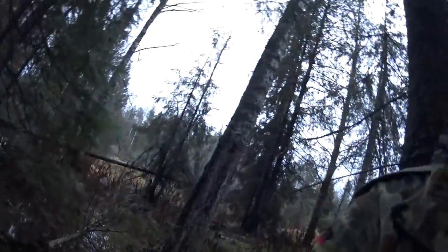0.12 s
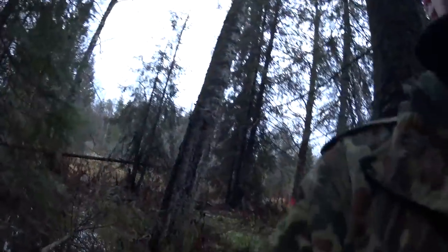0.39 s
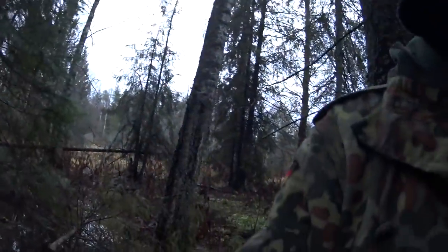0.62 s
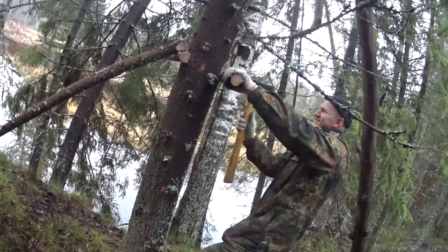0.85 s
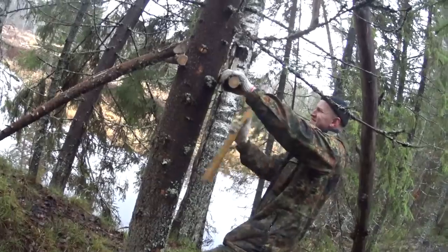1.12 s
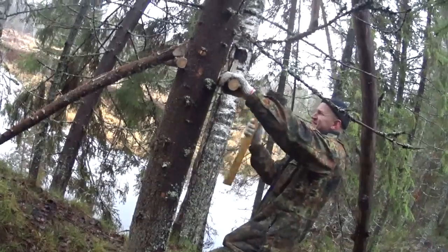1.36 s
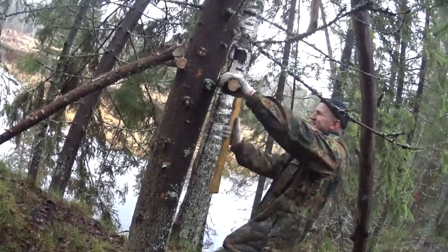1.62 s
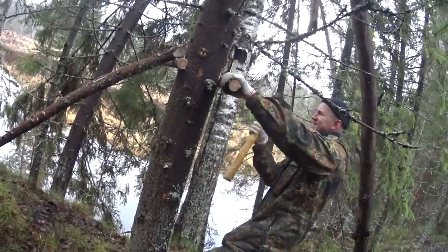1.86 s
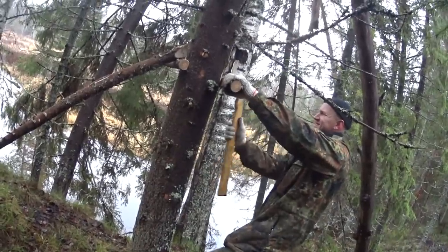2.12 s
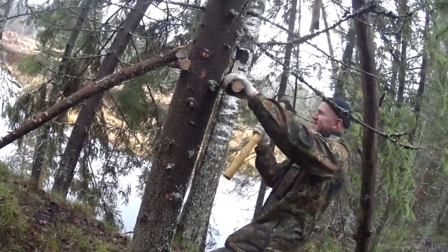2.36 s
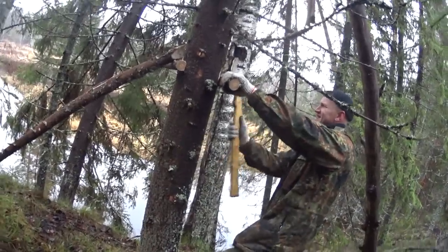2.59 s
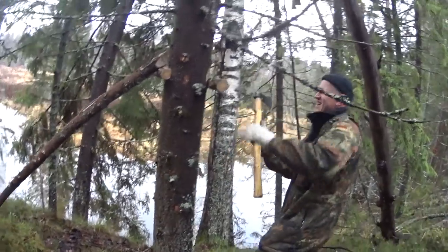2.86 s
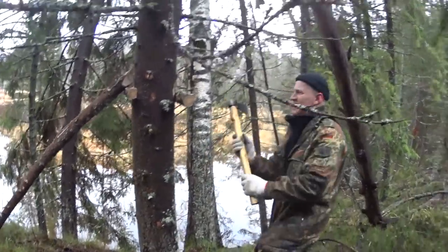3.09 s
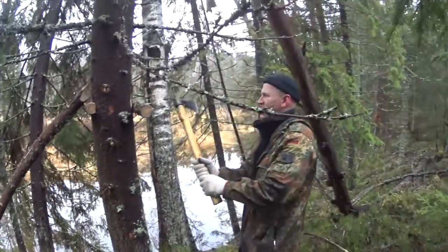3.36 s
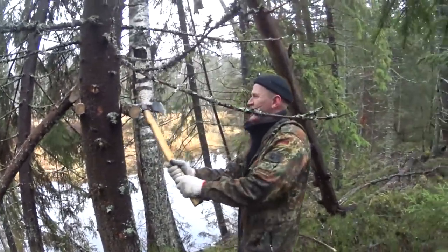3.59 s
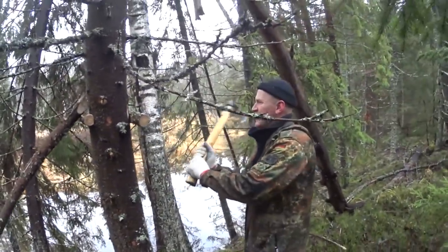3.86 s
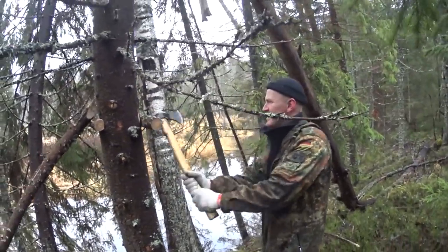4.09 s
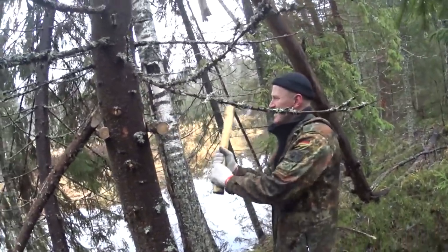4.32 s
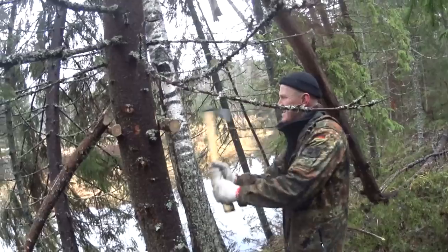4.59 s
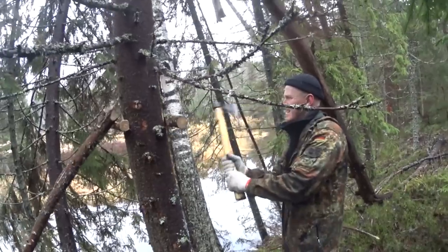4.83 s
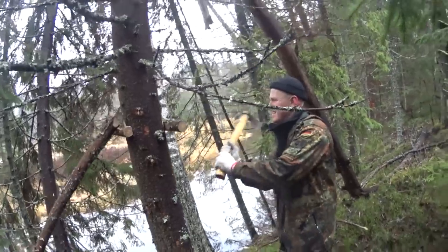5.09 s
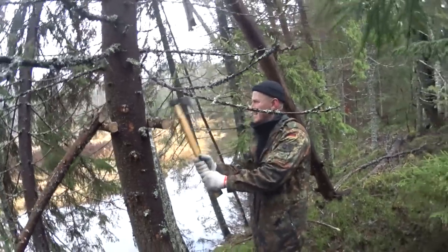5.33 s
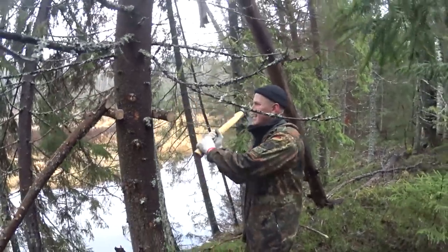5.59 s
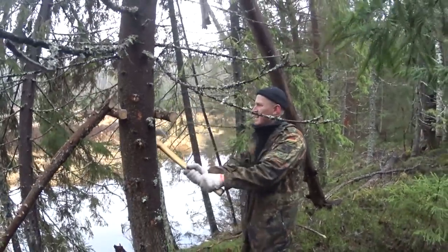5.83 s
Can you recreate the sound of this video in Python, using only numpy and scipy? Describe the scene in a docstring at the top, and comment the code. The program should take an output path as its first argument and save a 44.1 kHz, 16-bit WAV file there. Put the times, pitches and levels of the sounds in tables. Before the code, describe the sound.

Quiet, soft forest air with faint jacket hiss opens the scene; at about 0.6 s a small twig tick and a much sharper snap sound to the left. At 0.82 s the sound drops out for a few hundredths of a second, then returns wider with the fading tail of a blow. The back of a hatchet drives a nail into a trunk: sharp, dry woody cracks at about 1.2, 1.65, 2.1 and 2.55 s, the last with a clearer steel ring. From 1.0 to 1.25 s a hand scrapes roughly over the camera body, with clicks and a sleeve swish. After a gap of nearly a second, filled by light rustle and ticks, slower blows fall at 3.5, 4.1, 4.65, 5.2 and 5.8 s, the first more hollow. Each scatters briefly off the trees. A twig snaps near 4.96 s, among jacket rustling and faint rubs.

```python
"""In a forest, the back of a hatchet drives a nail into a trunk in steady blows, heard through a camera's two ports.
Each blow rings modes of wood and steel under a noisy crack; noise that dies away stands for the scatter off the trees.
On the camera body a hand rubs as friction noise; twigs tick as short noise bursts and a jacket rustles as
uneven hiss, over the coloured noise of the hush of the wood.
An edit leaves a short silence before the hammering; the camera widens the difference of its two ports."""
import sys
import numpy as np
from scipy import signal
from scipy.fft import rfft, irfft, next_fast_len
from scipy.io import wavfile
from scipy.ndimage import uniform_filter1d, map_coordinates

SR = 44100
rng = np.random.default_rng(int(sys.argv[2]) if len(sys.argv) > 2 else 0)


def digitize_waveform(pressure):
    """Quantize a signal to 16-bit integers and store it at the path in sys.argv[1].

    Rows of a 2-D input are taken as channels; values are limited to [-1, 1].
    """
    field = np.atleast_2d(pressure).T
    bounded = np.clip(field, -1, 1)
    quanta = np.round(bounded * 32767).astype(np.int16)
    wavfile.write(sys.argv[1], SR, quanta)


def boost_factor(decibels):
    """Convert a level in decibels to a linear amplitude factor."""
    exponent = np.asarray(decibels, float) / 20
    return 10 ** exponent


N = 262395  # length in samples


def unit(x):
    """Scale to rms 1."""
    return x / np.sqrt(np.mean(x ** 2) + 1e-20)


def along(points, hz):
    """Read (Hz, value) points on a log frequency axis."""
    f, v = np.transpose(points)
    return np.interp(np.log(hz + 1), np.log(f + 1), v)


def filtered(x, response):
    """Multiply the spectrum of x by a complex response of frequency."""
    m = next_fast_len(x.shape[-1] + 8192)
    spectrum = rfft(x, m) * response(np.fft.rfftfreq(m, 1 / SR))
    return irfft(spectrum, m)[..., :x.shape[-1]]


def coloured(x, spectrum):
    """Shape x by (Hz, dB) points."""
    return filtered(x, lambda hz: boost_factor(along(spectrum, hz)))


def noise(spectrum, size):
    """Coloured noise of rms 1."""
    return unit(coloured(rng.standard_normal(size), spectrum))


def wobble(rate):
    """A smooth random curve, rate knots a second."""
    knots = rng.standard_normal(int(N * rate / SR) + 4)
    return map_coordinates(knots, [np.arange(N) * rate / SR])


def level_curve(points, t):
    """Amplitude along (s, dB) points, all but silent outside them."""
    return boost_factor(np.interp(t, *np.transpose(points), left=-120, right=-120))


def add(track, s, sound):
    """Mix a sound into a track from time s."""
    part = track[..., min(round(s * SR), N):][..., :sound.shape[-1]]
    part += sound[..., :part.shape[-1]]


def ringing(modes, t):
    """Dying modes of alternate sign, at slightly new strengths for each blow."""
    total = 0
    for k, (hz, db, t60) in enumerate(modes):
        strength = boost_factor(db + 1.2 * rng.standard_normal() - 60 * t / t60)
        total = total + (-1) ** k * strength * np.sin(2 * np.pi * hz * t)
    return total


# Blows on the nail; the first falls before the hammering fades in, so only its tail is heard.
# Each row: start in seconds, then the levels of knock, hollow, steel and crack in dB.
BLOWS = [(0.72, -13.5, -19, -50, -18), (1.1895, -15, -33, -42, -24), (1.6466, -16, -32, -40.5, -22),
         (1.6894, -26.5, -37.5, -68, -40), (2.1126, -21, -18.5, -38, -20.5),
         (2.5591, -20, -52, -22.5, -17.5), (3.532, -17, -15, -49.5, -32.5),
         (4.118, -19.5, -27.5, -36, -17.5), (4.661, -21.5, -30.5, -43.5, -17.5),
         (5.225, -21.5, -37, -38.5, -16.5), (5.805, -19, -41, -53, -18)]
# Modes of the trunk, the handle, the wood grain, the hollow trunk, the steel head and the clink.
# Each row: frequency in Hz, level in dB within its layer, time to fall 60 dB in seconds.
TRUNK_MODES = [(875, -16.5, 0.014), (1134, -9, 0.025), (1213, -2, 0.023)]
HANDLE_MODES = [(1354, -4, 0.036), (1422, -9, 0.098)]
GRAIN_MODES = [(1930, -4, 0.014), (2090, -11, 0.022), (2300, -2, 0.017), (2658, -6.5, 0.02106),
               (3373, 1.5, 0.014)]
HOLLOW_MODES = [(452.4, -12.5, 0.043), (602.7, -15.5, 0.12)]
STEEL_MODES = [(4908, 0, .17), (4890, -9, .15), (4680, -16, .1)]
CLINK_MODES = [(5430, -6.5, 0.037), (6954, -7, 0.035), (9120, -2, 0.028)]
# Colours of the crack close by, of its return from the trees and of the thud down the trunk.
# Each row: frequency in Hz, relative level in dB.
CRACK_COLOUR = [(300, -7.5), (1500, -26.5), (3000, -6), (6000, -1.5), (9000, -13.5), (11000, -8)]
ECHO_COLOUR = [(300, -27.5), (1500, -5.5), (3000, -0.5), (6000, 0), (9000, -2), (11000, -3.5)]
THUD_COLOUR = [(40, -26), (150, -9), (400, -6.5), (900, -6), (3000, -51)]
# One distinct echo of the wood, a single pair: delay in seconds, level in dB.
FAR_BANK = (.184, -27)


def hatchet():
    """Each blow knocks the wood, rings the steel head, cracks, thuds down the trunk and fills the trees."""
    out, t = np.zeros(N), np.arange(SR // 4) / SR
    # driven hard while the head presses
    press = 1 + 0.95 * np.clip((.0042 - t) / 0.00083, 0, 1)
    contact = (1 - np.exp(-t / 0.00062)) ** 2 * press
    late = (1 - np.exp(-t / 0.0053)) ** 2  # the low trunk sound swells after the contact
    bass_cut = signal.butter(2, 500, "high", fs=SR)  # the small contact radiates little bass
    for s, knock_db, hollow_db, steel_db, crack_db in BLOWS:
        # the handle gains with hollow over knock
        handle_db = knock_db - 6 + 0.18 * (hollow_db - knock_db)
        # the grain grows by 2 dB a second as the nail sinks; a dull blow wakes it less
        grain_db = knock_db - 11.5 + 2 * s + 0.21 * (crack_db - knock_db)
        # a cleaner hit on the nail raises steel and clink together
        clink_over_crack_db = -10 + .3 * (steel_db + 38.5)

        trunk = boost_factor(knock_db) * ringing(TRUNK_MODES, t)
        handle = boost_factor(handle_db) * ringing(HANDLE_MODES, t)
        grain = boost_factor(grain_db) * ringing(GRAIN_MODES, t)
        hollow = boost_factor(hollow_db) * late * ringing(HOLLOW_MODES, t)
        steel = boost_factor(steel_db) * ringing(STEEL_MODES, t)
        crackle = boost_factor(-60 * t / 0.015) * noise(CRACK_COLOUR, len(t))
        clink = boost_factor(clink_over_crack_db) * ringing(CLINK_MODES, t)
        crack = boost_factor(crack_db) * (crackle + clink)
        thud = boost_factor(knock_db - 25 - 60 * t / 0.25) * late * noise(THUD_COLOUR, len(t))

        wood = trunk + handle
        sharp = signal.lfilter(*bass_cut, contact * (wood + grain + crack))
        add(out, s, sharp + steel + hollow + thud)
        into_trees = contact * (handle + boost_factor(-2) * trunk + boost_factor(-3.5) * grain) + hollow
        add(out, s, boost_factor(-2.5) * signal.fftconvolve(into_trees, trees(far_db=-16)))
        delay, echo_db = FAR_BANK
        add(out, s + delay, boost_factor(echo_db) * contact * wood)
        # the crack returns as smooth hiss
        add(out, s, boost_factor(crack_db + 22) * coloured(trees(far_db=-16.5), ECHO_COLOUR))
    return out


# Decay of the scatter off the near and the far trees.
# Each row: frequency in Hz, time to fall 60 dB in seconds.
NEAR_TREES = [(200, 0.052), (1200, 0.11), (5000, 0.21), (11000, 0.16)]
FAR_TREES = [(200, 0.58), (1200, 1), (5000, 0.85), (11000, 0.37)]


def trees(far_db):
    """A fresh scatter off the trunks: near ones die fast, far ones linger, single trunks make it lumpy."""
    hz, t, z = signal.stft(rng.standard_normal(SR), SR, nperseg=256)
    near = boost_factor(-60 * t / along(NEAR_TREES, hz)[:, None])
    far = boost_factor(far_db - 60 * t / along(FAR_TREES, hz)[:, None])
    trunks = uniform_filter1d(rng.standard_normal(z.shape), size=20, axis=0)
    trunks = uniform_filter1d(trunks, size=2, axis=1)
    lumps = boost_factor(2.2 * unit(trunks))
    tail = signal.istft(z * (near + far) * lumps, SR, nperseg=256)[1]
    return np.pad(tail, (150, 0)) / np.linalg.norm(tail)  # starts 150 samples late, energy 1


# The hand slides round the camera body in one long drag.
# Each row: time in seconds, pressure as a level in dB.
DRAG = [(.955, -62), (1.0, -49), (1.055, -44), (1.068, -37.5), (1.08, -52), (1.104, -52.5), (1.112, -37),
        (1.155, -32.5), (1.17, -41.5), (1.184, -22.5), (1.241, -20), (1.247, -58), (1.3, -40),
        (1.345, -39.5), (1.385, -64), (1.445, -70)]
# Short shifts of the fingers on the body.
# Each row: start in seconds, length in seconds, peak level in dB, place of the peak from 0 to 1.
RUBS = [(.869, 0.021, -53.5, 0.1), (0.927, 0.026, -46, .2), (1.485, 0.14, -49.5, 0.38),
        (1.688, .095, -40.5, 0.28), (1.798, 0.056, -51, 0.5), (1.995, 0.036, -50.5, 0),
        (2.352, 0.13, -45, 0.65), (2.515, 0.17, -45, 0.48), (2.695, 0.13, -55, 0.62),
        (2.964, 0.0296, -56, 0.1), (3.041, 0.019, -60.5, .5), (3.22, 0.11, -52, 0.48),
        (3.398, 0.0106, -49, .05), (4.006, 0.093, -55, 0.28), (4.662, 0.042, -49, 0), (5.235, .027, -56, 0),
        (5.369, 0.039, -62, .2), (5.829, 0.053, -47, 0)]
# Colours of the dull and the bright part of the rub.
# Each row: frequency in Hz, relative level in dB per Hz for the dull part, in dB for the bright part.
GRIP_COLOUR = [(24, -67.5), (40, -18), (150, -7.5), (314, 1.5), (411, 2), (700, -6), (1380, -18.5),
               (3000, -31.5), (3900, -88.5), (6600, -120)]
SCRATCH_COLOUR = [(300, -26.5), (700, 4), (1200, 1.5), (1700, -2.5), (2600, -8.5), (5000, -18),
                  (11000, -37)]


def hand():
    """Skin sticks and slips on the casing: lumpy low noise, and a scratch whose share shrinks with pressure."""
    t = np.arange(N) / SR
    drag_db = np.interp(t, *np.transpose(DRAG), left=-120, right=-120)
    dull = boost_factor(drag_db)
    bright = dull * boost_factor(5.5 - 0.29 * (drag_db + 45))  # pressing harder dulls it
    rise_db_per_s, fall_db_per_s = 135, 142
    for start, length, db, place in RUBS:
        edge = np.clip(np.minimum(t - start, start + length - t) / .002 + .5, 0, 1)
        since_peak = t - start - place * length
        drop_db = np.maximum(-rise_db_per_s * since_peak, fall_db_per_s * since_peak)
        level = edge * boost_factor(db - drop_db)
        dull = dull + level
        bright = bright + level * boost_factor(-14.5 - (db + 44.5))  # the scratch peaks alike in every rub
    slips = unit(boost_factor(2.6 * wobble(150) + 1.5 * wobble(50)))  # fast slips and slower surges of the skin
    return casing(dull * slips, GRIP_COLOUR) + casing(bright * slips, SCRATCH_COLOUR)


def casing(drive, spectrum):
    """Friction noise of a given strength, coloured by the camera body."""
    gain = boost_factor(along(spectrum, np.linspace(0, SR / 2, num=4096)))
    return coloured(drive * rng.standard_normal(N), spectrum) / np.sqrt(np.mean(gain ** 2))


# Twigs, chips and buttons.
# Each row: start in seconds, peak level in dB, body over click in dB, time to fall 60 dB in seconds.
TICKS = [(0.4825, -49.5, 7, 0.018), (0.5946, -34.5, -1, 0.012), (0.6373, -12, -10, 0.012),
         (0.9354, -42, 9, 0.011), (1.0052, -27.5, 3.5, 0.027), (1.0669, -25, 3, 0.04),
         (1.1105, -16, 4, 0.0075), (1.1824, -16, 6.5, 0.04), (2.339, -57.5, 20.5, 0.011),
         (3.0056, -43, -7, 0.026), (3.162, -45.5, 2, 0.02), (3.3434, -31, -3.5, 0.019),
         (3.379, -38.5, -6, 0.085), (3.4015, -26, -13, 0.018), (4.0164, -32, -3.5, 0.01),
         (4.858, -34, -34, 0.017), (4.8798, -28, -34, 0.043), (4.9234, -50, 14, 0.017),
         (4.9647, -16, -7.5, 0.05), (5.0156, -32, -5.5, 0.012), (5.1128, -48.5, 17, 0.023),
         (5.73, -59, 16.5, 0.014)]
# Colours of the bright and the dull part of a snap. Each row: frequency in Hz, relative level in dB.
CLICK_COLOUR = [(1200, -25), (2800, 0), (6000, 4), (11000, -7.5)]
BODY_COLOUR = [(200, -27), (700, -7), (1500, -2.5), (2500, -3.5), (4500, -24)]


def ticks():
    """Short snaps: a bright click over a duller body, with a faint answer from the trees."""
    out, t = np.zeros(N), np.arange(SR // 20) / SR
    faint_per_s = 3.9
    faint = []  # faint ticks at random moments, one in each slot
    for slot in np.arange(0, N / SR, 1 / faint_per_s):
        s = slot + rng.random() / faint_per_s
        faint.append((s, -56.5 + 4.5 * rng.standard_normal(), -4, .02))
    for s, db, body_db, t60 in TICKS + faint:
        snap = noise(CLICK_COLOUR, len(t)) + boost_factor(body_db) * noise(BODY_COLOUR, len(t))
        # a noise burst peaks at about four times its rms
        add(out, s, boost_factor(db - 60 * t / max(t60, .003)) * snap / 4)
    answer = signal.fftconvolve(out, trees(far_db=-41.0))[:N]
    return out + boost_factor(-29.5) * answer


# The jacket moving, and a sleeve sliding. Each row: time in seconds, level in dB.
JACKET = [(0, -74), (.3, -73.5), (.42, -65), (.6, -74.5), (.9, -75.5), (1.3, -60), (1.55, -108), (2.9, -75),
          (3.05, -58.5), (3.15, -65.5), (3.3, -56), (3.5, -85), (4.05, -59), (4.6, -71.5), (4.9, -58),
          (5.1, -63.5), (5.5, -64), (5.95, -94)]
SWISH = [(1.1, -56), (1.14, -47), (1.18, -62), (1.3, -82), (1.36, -49.5), (1.43, -64.5), (1.47, -71),
         (1.53, -62.5), (1.56, -90)]
# Colours of the cloth and of the sleeve.
# Each row: frequency in Hz, relative level in dB per Hz for the cloth, in dB for the sleeve.
CLOTH_COLOUR = [(590, -26), (1000, 7.5), (1040, -8), (1200, 2.5), (2570, 4), (6210, 2.5), (11000, 0),
                (14300, -33), (22000, -120)]
SLEEVE_COLOUR = [(2000, -10.5), (3800, 0), (4800, 1.5), (5600, -14.5), (7000, -34), (11000, -31.5)]


def jacket():
    """Stiff cloth: a treble hiss made of uneven crinkles, and a smoother sleeve."""
    t = np.arange(N) / SR
    crinkle = unit(boost_factor(4.0 * wobble(35) + 1.6 * wobble(400)))
    cloth = boost_factor(np.interp(t, *np.transpose(JACKET))) * crinkle * noise(CLOTH_COLOUR, N)
    sleeve = level_curve(SWISH, t) * noise(SLEEVE_COLOUR, N)
    return cloth + sleeve


# Colours of the forest air before and after the edit. Each row: frequency in Hz, relative level in dB per Hz.
HUSH_BEFORE = [(24, -65), (40, -38), (139, -15.5), (189, -6), (364, -6.5), (569, -4.5), (1180, -7.5),
               (1640, -12.5), (1800, -13), (11000, -30), (14300, -53), (22000, -120)]
HUSH_AFTER = [(24, -47.5), (40, -11.5), (222, -6.5), (356, -4), (410, -3.5), (440, -4), (543, -1.5),
              (737, -5.5), (2750, -10.5), (11000, -19.5), (14300, -110), (22000, -120)]
# Middle levels of the air, a single pair: before and after the edit, in dB.
HUSH_DB = -66, -67


def hush(spectrum, db, wide, alike):
    """Diffuse air of the forest: gently wavering noise whose port difference is only partly like the sum."""
    a, b = (boost_factor(db + 0.856 * wobble(10) + .6 * wobble(34)) * noise(spectrum, N) for _ in range(2))
    alike = np.clip(alike, 0, 1)
    return ports(a, alike * a + np.sqrt(1 - alike ** 2) * b, wide)


def ports(total, difference, wide):
    """Left and right from the port sum and the difference, which is a quarter cycle off the sum."""
    side = filtered(difference, lambda hz: -1j * boost_factor(along(wide, hz)))
    return np.array([total + side, total - side])


# Port difference over port sum, before the edit and in the hammering. Each row: frequency in Hz, level in dB.
WIDE_BEFORE = [(60, -10), (170, -8), (500, -0.5), (1420, 2.5), (4090, -2), (11800, -6.5)]
WIDE_AFTER = [(60, -2.5), (130, -0.5), (270, 4.5), (580, 11), (1230, 9.5), (2600, 4.5), (5540, -2),
              (11800, -7)]
# Silence at the edit, a single pair: start and end in seconds.
EDIT = (.8165, 0.8506)


def scene():
    """Before the edit ticks and jacket lead on the left; after it they and the blows lead right, the hand left."""
    t = np.arange(N) / SR
    before = t < EDIT[0]
    after = np.clip((t - EDIT[1]) / 0.0088, 0, 1)  # fades in over 8.8 ms
    blows, rubs, small = hatchet(), hand(), ticks() + jacket()
    first = ports(small, -small, WIDE_BEFORE)
    first = first + hush(HUSH_BEFORE, HUSH_DB[0], WIDE_BEFORE, alike=.2)
    second = ports(small + blows + rubs, small + blows - rubs, WIDE_AFTER)
    second = second + hush(HUSH_AFTER, HUSH_DB[1], WIDE_AFTER, alike=0.93)
    return before * first + after * second


def band_limit(x):
    """A steep low-pass at the top of the band."""
    return signal.sosfilt(signal.butter(12, 12370, fs=SR, output="sos"), x)


def record(dry):
    """The camera rounds off loud peaks, cuts the deep bass and falls steeply above its band limit."""
    rounded = dry / (1 + np.abs(dry / .8) ** 4) ** (1 / 4)
    low_hz, top_hz = 80, 10786

    def band(hz):
        """Second-order bass cut and a very steep treble limit."""
        return (1j * hz / (low_hz + 1j * hz)) ** 2 / np.sqrt(1 + (hz / top_hz) ** 60)

    mix = filtered(rounded, band)
    return band_limit(mix)


dry = scene()
out = record(dry)
digitize_waveform(out)
```